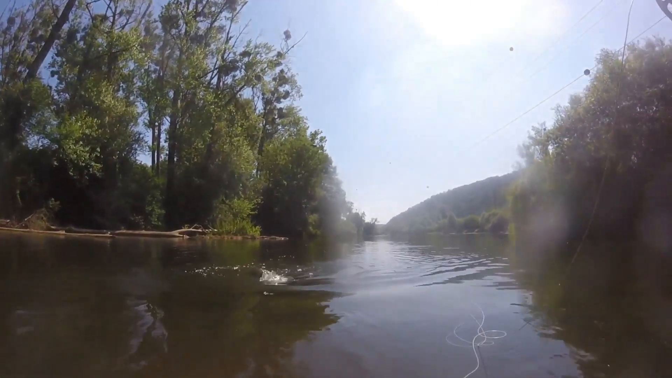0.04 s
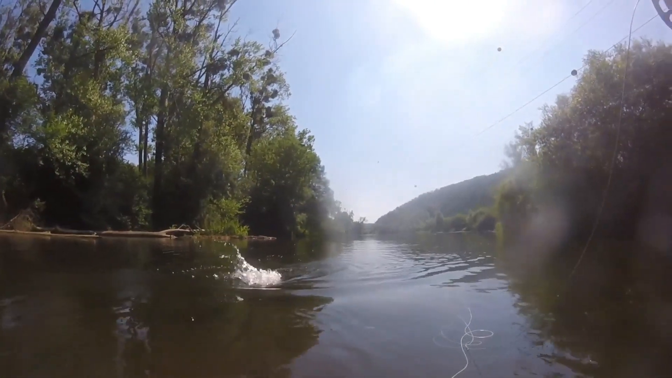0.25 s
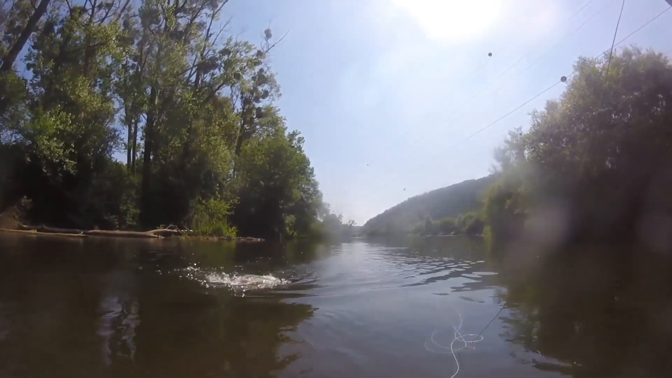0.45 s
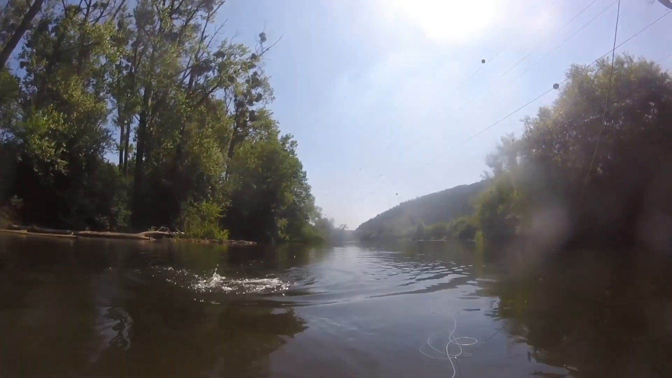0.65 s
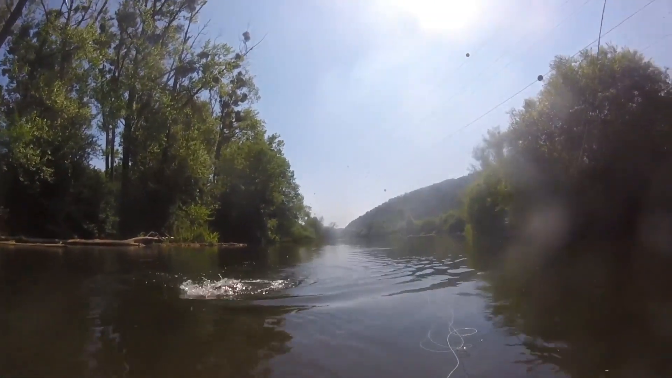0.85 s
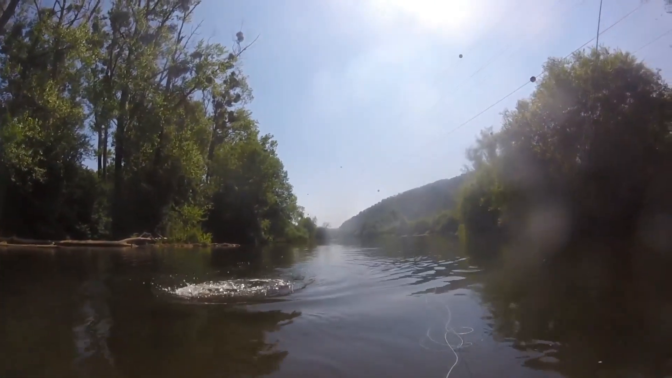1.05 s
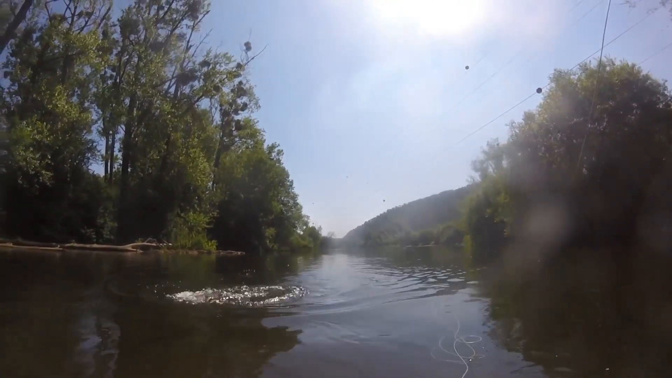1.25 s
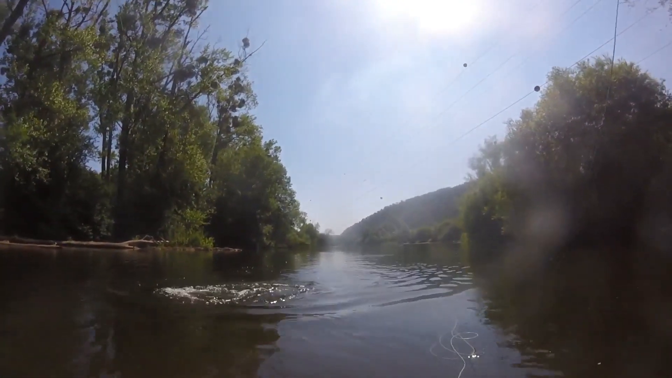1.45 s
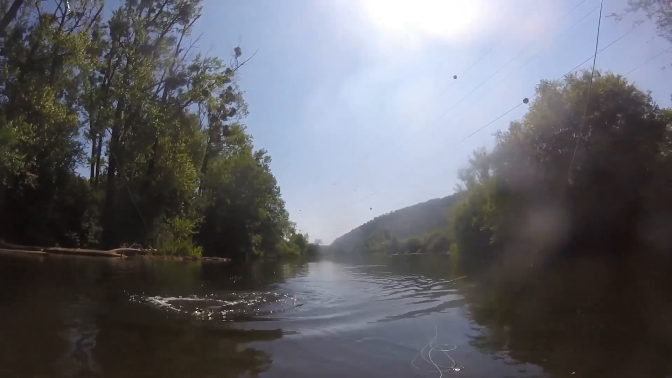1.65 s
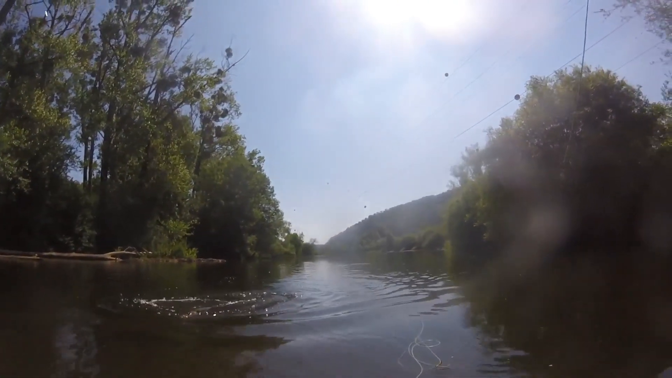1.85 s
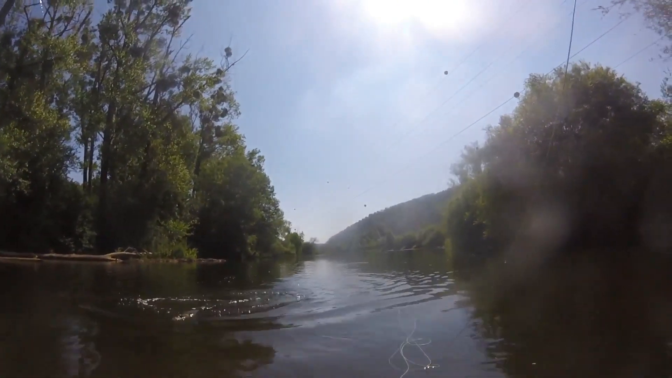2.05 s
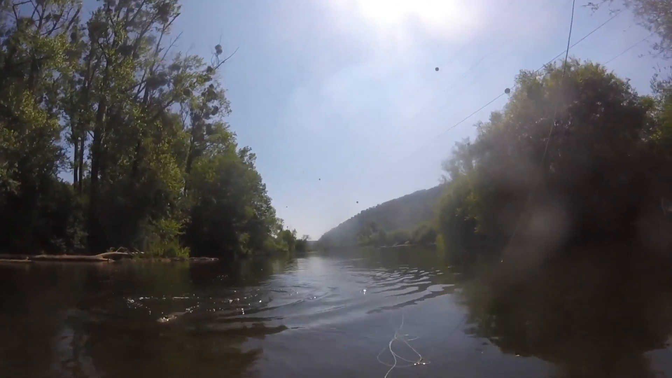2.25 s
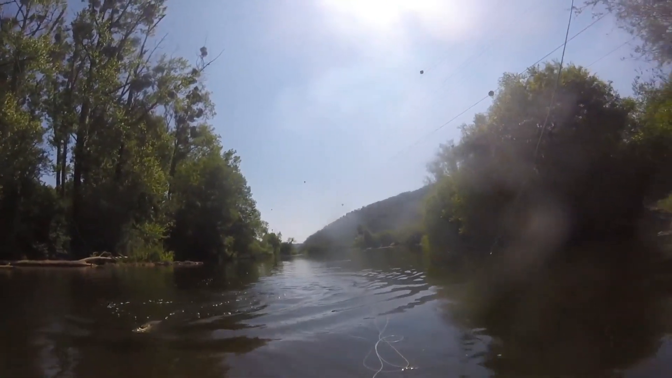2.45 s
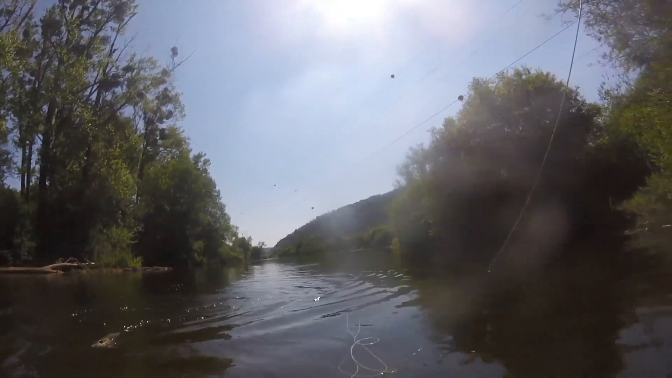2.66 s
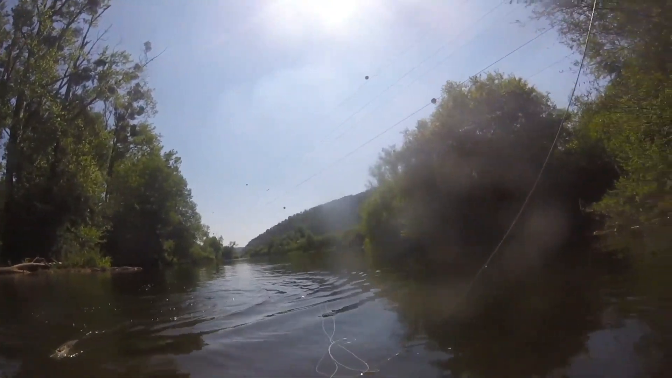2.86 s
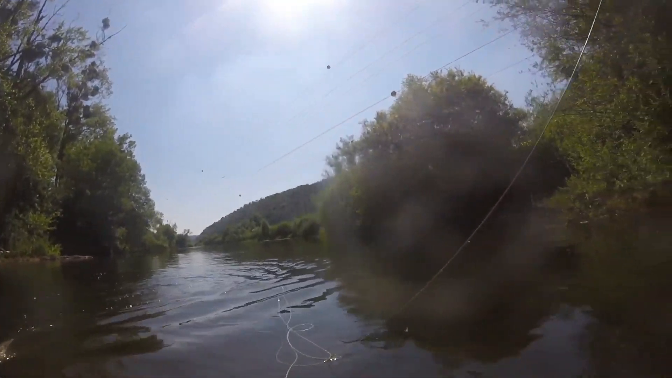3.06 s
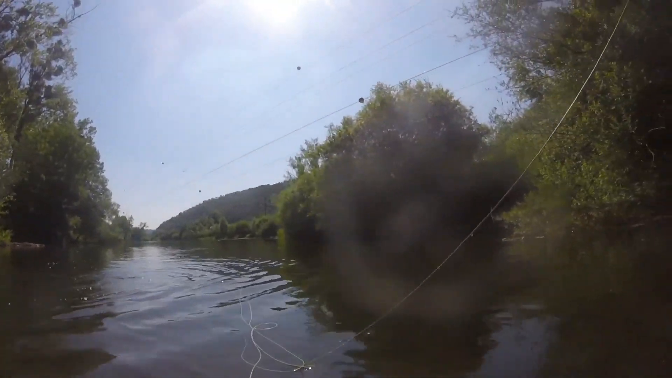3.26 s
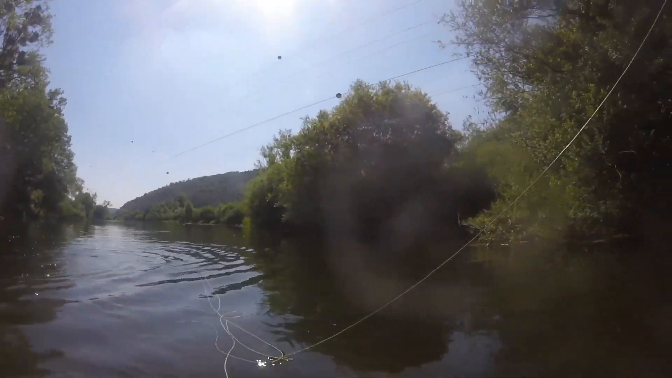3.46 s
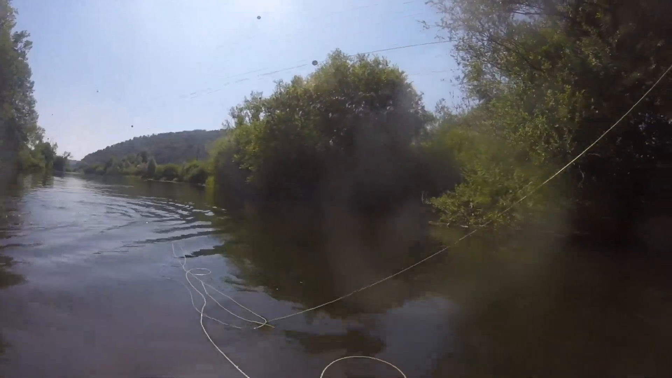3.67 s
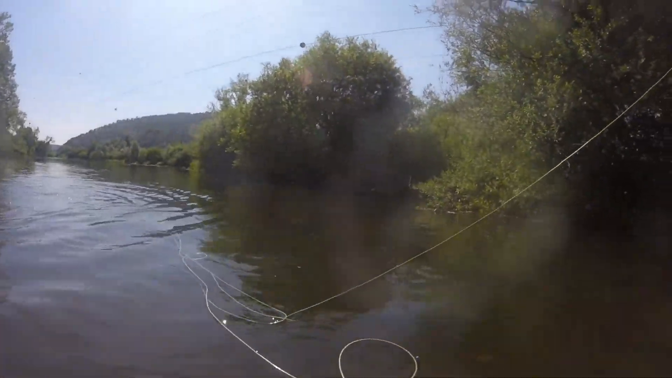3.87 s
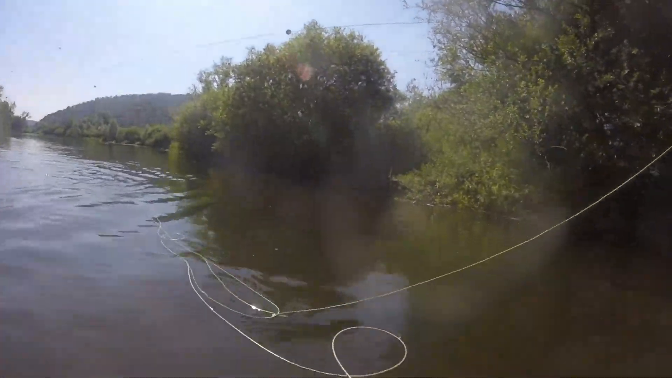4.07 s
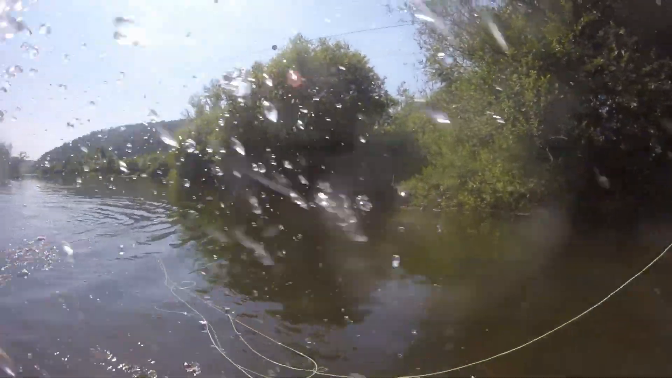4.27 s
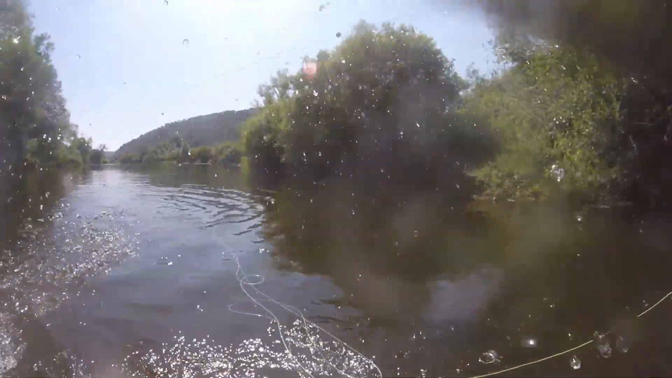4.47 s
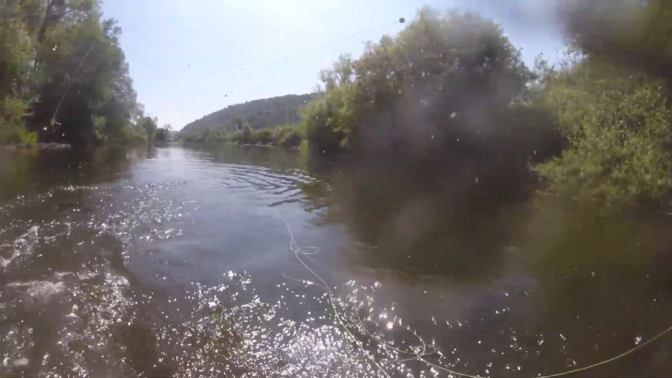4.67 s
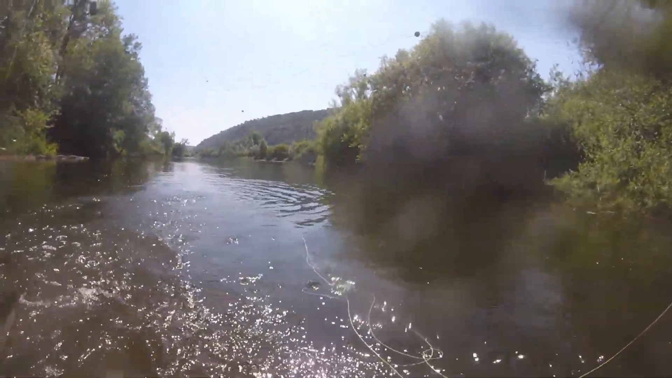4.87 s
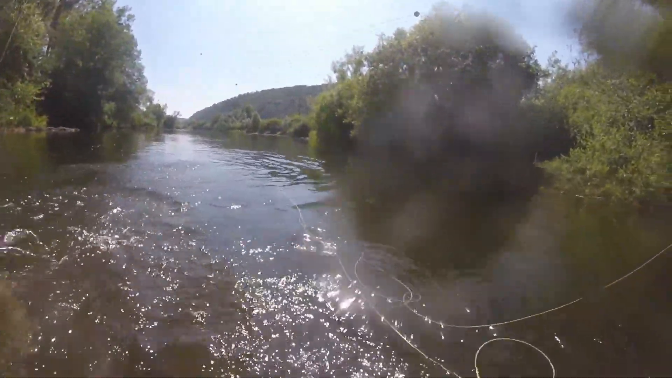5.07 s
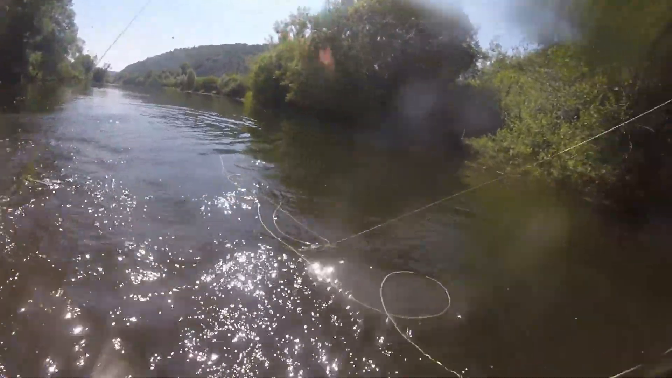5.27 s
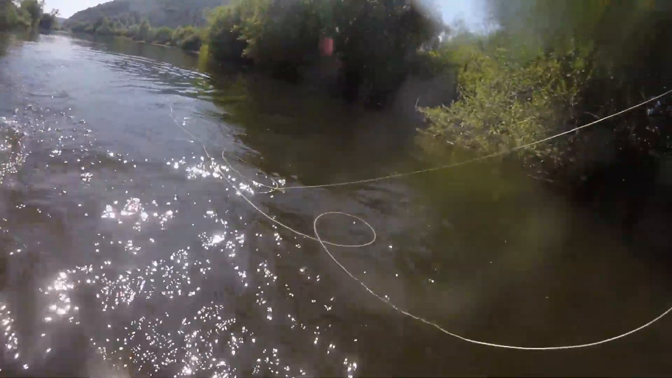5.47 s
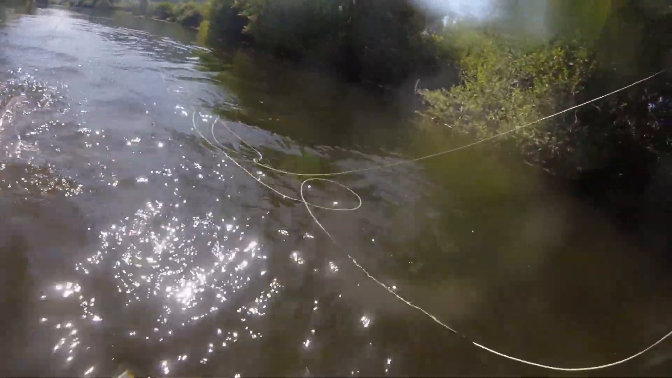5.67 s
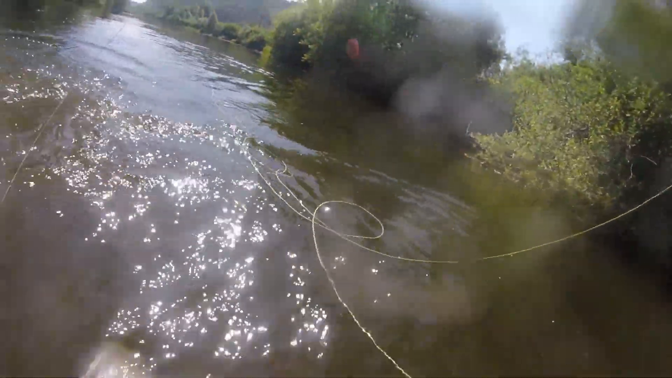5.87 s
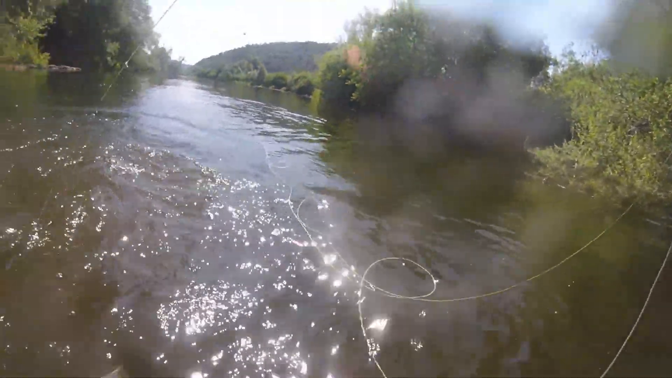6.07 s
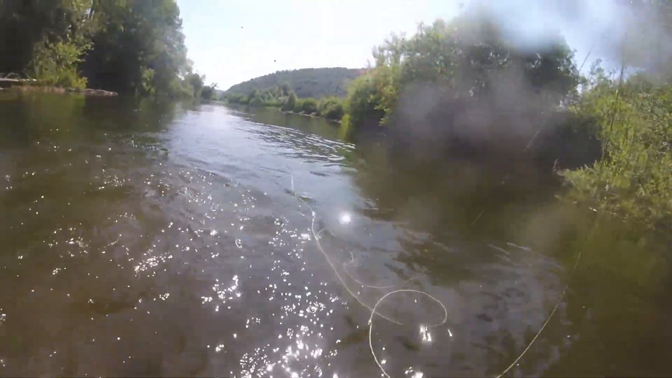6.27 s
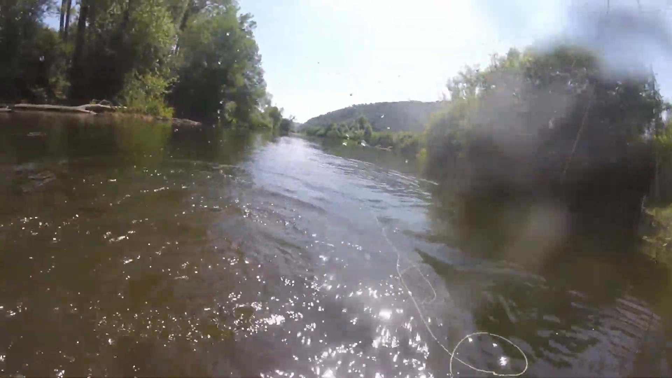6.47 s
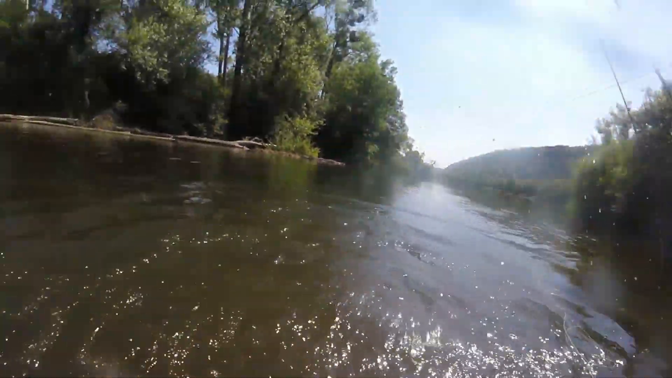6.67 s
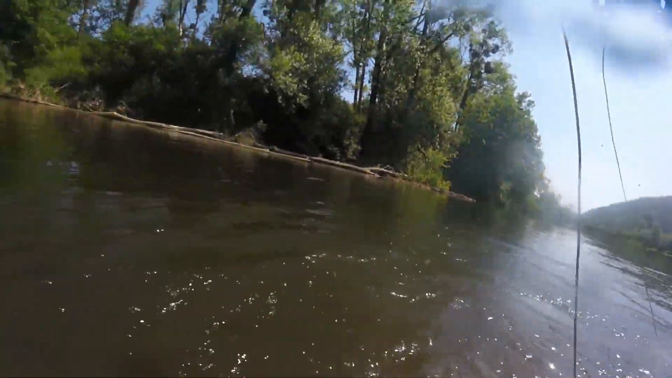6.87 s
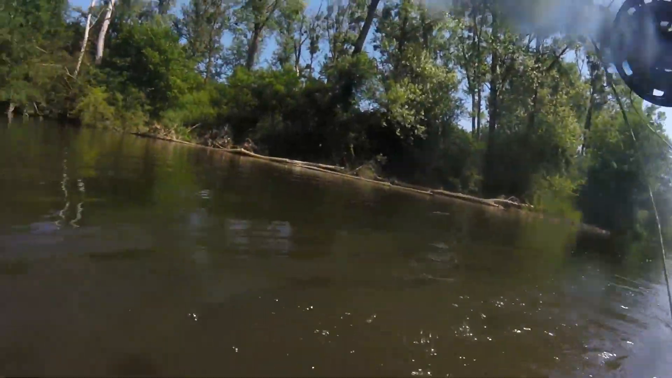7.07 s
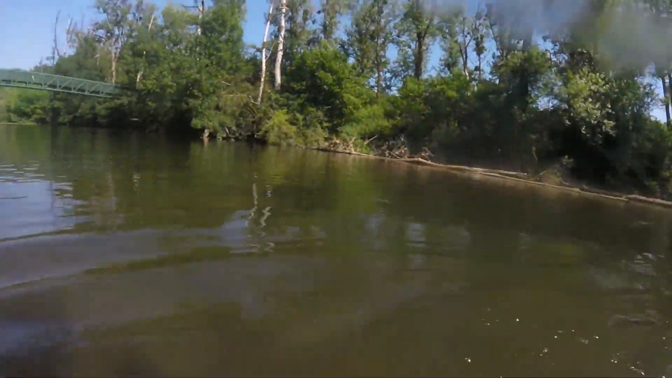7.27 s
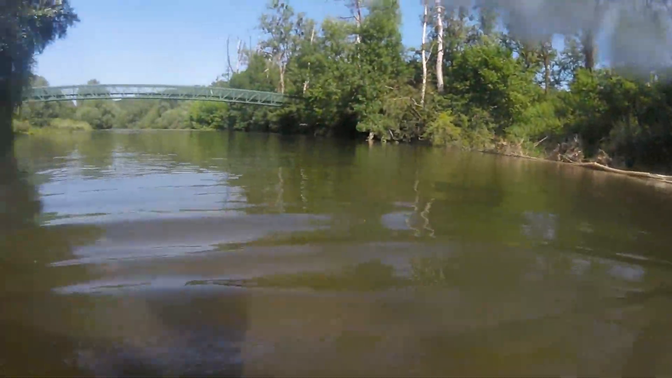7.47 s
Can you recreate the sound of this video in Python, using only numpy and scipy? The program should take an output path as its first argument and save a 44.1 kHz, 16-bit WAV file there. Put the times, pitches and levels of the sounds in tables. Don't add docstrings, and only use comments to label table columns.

```python
import sys
import numpy as np
from scipy import signal
from scipy.io import wavfile
from scipy.ndimage import uniform_filter1d

SR = 44100
rng = np.random.default_rng(int(sys.argv[2]) if len(sys.argv) > 2 else 0)


def invert_db(x):
    u = np.asarray(x, float) / 20
    return 10 ** u


def to_wav(sig):
    pcm = np.clip(np.atleast_2d(sig), -1, 1) * 32767
    pcm = np.round(pcm).astype(np.int16)
    wavfile.write(sys.argv[1], SR, pcm.T)


N = 331499

# hz, level_db_per_hz
AIR_COLOUR = [(12, -26), (20, -17), (42, -2), (373, -19), (464, -20.5), (1680, -30.5), (2210, -30.5),
              (3060, -34), (6770, -42.5), (8430, -47.5), (9930, -49.5), (11100, -52.5), (13800, -58)]
AIR_DB = -52
# hz, level_db
WHINE = [(9652, -83)]

# time_s, effort_db
EFFORT = [(0.0, -19), (2.6, -23.5), (3.5, -14), (4.1, -9), (4.45, -7.5), (4.9, -3), (5.55, 0.5), (6.05, -1),
          (6.3, -2), (7.05, -3.5), (7.27, -15.5), (7.38, -4.5), (7.52, -4)]
IDLE_DB, IDLE_HZ, IDLE_WANDER = -24.5, 12, 0.1996
# dip_s, peak_db, swing_hz
LURCHES = [(3.739, -27.5, 11), (3.952, -21, 10.6), (4.22, -16, 17), (4.35, -23, 12.7), (4.558, -27.5, 27.4),
           (4.773, -10.5, 15.5), (5.011, -15.5, 10), (5.283, -23.5, 15.3), (5.39, -14.5, 10.3),
           (5.582, -12, 14.1), (5.77, -11, 13.3), (6.025, -12.5, 11.4), (6.204, -24, 9.5),
           (6.351, -20, 13.4), (6.489, -18, 9), (6.752, -22.5, 8.1), (7.102, -19, 10.6),
           (7.452, -20.5, 8.1)]
LURCH_CYCLES = 1
# hz, level_db_per_hz
RUMBLE_COLOUR = [(14, -55.5), (24, -6), (31, 3.5), (43, -9), (59, -11), (171, -25.5), (227, -40),
                 (400, -38), (520, -79), (880, -120)]
RUMBLE_DB = -36
# peak_s, level_db, length_s
JOLTS = [(3.59, -41, 0.067), (4.22, -35, 0.048), (4.36, -30, 0.03), (4.53, -33, 0.017), (4.98, -48, .03),
         (5.04, -27.5, 0.039), (5.6, -35, 0.057), (6.06, -32, 0.068), (6.46, -31.5, 0.018),
         (6.6, -26, 0.017), (7.37, -40, 0.034)]

# peak_s, level_db, length_s
FISH = [
    (0.098, -57.5, 0.35),
    (0.29, -55, 0.016),
    (0.5, -60.5, 0.04),
    (0.825, -54.5, .2),
    (1.19, -63, 0.025),
]
# hz, level_db_per_hz
FISH_COLOUR = [(180, -44), (300, -2), (574, -4.5), (781, 0), (1220, -9.5), (1340, -11), (2520, -1),
               (2900, -13.5), (3950, -8), (4400, -23), (5130, -25), (12000, -49), (15600, -72),
               (22000, -120)]
# time_s, level_db
PATTER = [
    (4.41, -51),
    (4.47, -68),
    (4.62, -66),
    (4.75, -64),
    (4.85, -76),
    (5.0, -69),
]
# start_s, # peak_db, pitch_hz
DRIPS = [(0.125, -48, 2470), (0.288, -39.5, 812), (0.405, -43, 2552), (0.503, -48.5, 716),
         (0.809, -43, 2370), (0.84, -35, 2490), (0.856, -40, 794), (1.008, -43, 2520), (4.456, -34, 2000),
         (4.553, -38.5, 603), (4.705, -47, 1160), (4.738, -45, 1320), (4.82, -45, 525), (4.821, -41, 2460),
         (4.882, -44, 584), (5.1, -42.5, 470), (5.16, -41.5, 396), (5.219, -39.5, 480), (5.0, -43.5, 595),
         (5.289, -41, 1270), (5.363, -43, 1170), (5.381, -43, 1790), (5.478, -41, 1286), (5.54, -35, 2860),
         (5.563, -32.5, 770), (5.646, -39.5, 2200), (5.683, -40.5, 2400), (5.849, -34, 2220),
         (5.903, -45.5, 1350), (6.034, -42, 1680), (6.106, -38, 1740), (6.132, -42, 1270),
         (6.193, -40.5, 2440), (6.226, -42.5, 2240), (6.306, -37.5, 1810), (6.328, -41, 2250),
         (6.352, -42, 3500), (6.728, -39, 724)]
# start_s, peak_db, centre_hz
TICKS = [(0.101, -43, 3900), (0.178, -53, 5170), (0.509, -53, 4130), (0.621, -52, 3160), (0.859, -47, 3780),
         (1.123, -50, 3300), (4.471, -57, 4970), (4.51, -41, 3400), (4.545, -38, 3330), (4.602, -53, 4760),
         (4.615, -48, 6400), (4.648, -47, 3500), (4.687, -46, 4600), (4.701, -45, 3630),
         (4.765, -41.5, 3930), (4.827, -49, 4930), (4.883, -43, 3369), (4.96, -46, 3410),
         (5.294, -47, 3360), (5.433, -44.5, 4630), (5.464, -45.5, 5600), (5.479, -48, 4909),
         (5.598, -44, 3520), (5.819, -48.5, 4040), (5.932, -48, 3380), (6.686, -47, 5000),
         (7.046, -47.5, 3630),
         (4.4404, -44, 3400), (4.444, -46, 5000), (4.4554, -43, 4800), (4.586, -53, 5100),
           (4.595, -49, 5800), (4.6294, -50, 4600), (4.6764, -53, 5200), (4.688, -54, 7000),
           (4.6944, -54, 6500), (4.7264, -53, 6500), (4.7324, -54, 6000), (4.739, -53, 6500),
           (4.749, -56, 6300), (4.7586, -46, 3670), (4.79, -59, 7000), (4.813, -49, 4500),
           (4.8884, -51, 3600), (4.9104, -56, 6000), (4.9182, -49, 3400), (4.9457, -55, 6000),
           (4.959, -53, 6700), (5.0439, -52, 6900), (5.6216, -48, 3100), (6.0314, -48, 3470),
           (6.626, -48, 3390), (6.7251, -50, 3000)]
# start_s, level_db,
# centre_hz, length_s
SPURTS = [(4.049, -36, 2160, .008), (4.057, -43.5, 760, .015), (4.066, -56, 3800, .015),
          (4.09, -50.5, 3300, .012), (4.09, -64, 6900, .012), (4.094, -58, 2280, .012),
          (4.107, -45.5, 770, .03), (4.149, -55, 6650, .016), (4.152, -50.5, 3700, .012),
          (4.163, -41, 520, .014), (4.176, -50, 3300, .008), (4.178, -46.5, 2330, .015),
          (4.21, -58.5, 6800, .02), (4.218, -43.5, 554, .015), (4.228, -46.5, 2250, .012),
          (4.279, -53, 5960, .008), (4.301, -53, 5900, .015), (4.374, -24.5, 5580, 0.013),
          (4.372, -24, 4200, .014), (4.375, -36, 7700, .007), (4.417, -39, 2300, .022),
          (4.506, -47.5, 2360, .02), (4.589, -50.5, 2330, .035), (6.17, -57.5, 2680, .02),
          (6.617, -50, 816, .04), (0.099, -52, 3900, .006), (0.1, -52, 2300, .012),
          (0.836, -48, 3400, .006), (0.837, -48, 1400, .008), (4.422, -58, 11000, .004),
          (4.98, -53, 2100, .012), (5.05, -52, 2300, .03), (5.537, -47, 3550, .006), (5.59, -51, 2400, .03),
          (5.678, -50, 1900, .006), (5.72, -54, 3600, .01), (5.9, -50, 1300, .02), (6.031, -50, 2300, .008),
          (6.09, -51, 2400, .015), (6.19, -52, 1800, .025), (6.44, -51, 2350, .01), (6.475, -46, 650, .006),
          (6.572, -56, 11500, .004), (6.8, -53, 2200, .05), (7.04, -54, 2250, .03)]

# start_s, length_s, start_hz, end_hz, level_db
NOTES = [(1.548, 0.064, 3650, 3540, -56), (1.646, 0.059, 3800, 3600, -58), (1.68, 0.2, 3640, 3720, -63.5),
         (1.673, 0.19, 3950, 4100, -69), (1.854, 0.064, 3800, 3440, -55), (2.065, 0.075, 2600, 2480, -55.5),
         (2.13, .035, 2470, 2570, -60), (2.366, .03, 3300, 3350, -67), (2.433, 0.033, 3280, 3450, -65),
         (2.526, .025, 3330, 3400, -67), (2.607, 0.056, 3950, 3460, -57.5), (2.721, 0.034, 3540, 4100, -65),
         (2.749, 0.033, 3150, 3520, -55), (2.775, 0.054, 3250, 3300, -63), (2.778, .035, 3500, 3520, -60),
         (2.765, 0.045, 3900, 4100, -60.5), (2.835, 0.057, 3780, 3520, -59),
         (2.904, 0.0274, 3480, 3190, -54.5), (2.93, .07, 3230, 3250, -62.5),
         (2.928, 0.018, 3930, 3990, -59), (3.328, 0.016, 3050, 3780, -59), (3.4, .012, 4600, 4500, -57),
         (3.406, .012, 4050, 3950, -62), (3.413, 0.013, 3700, 3120, -57)]
# centre_hz, width_hz, gain_db
BIRD_LIFT = [(3250, 290, -3), (3890, 420, -1)]
TRILL_S, TRILL_GAP_S, TRILL_DB, TRILL_ENDS_DB = 1.964, .0736, -49.5, -2.5
BUZZ_FALLING, BUZZ_RISING, BUZZ_TRILL = .45, .55, .22

# peak_s, level_db, length_s
STROKES = [
    (3.0, -49.5, 0.063),
    (3.28, -47.5, 0.078),
    (3.62, -47, 0.055),
    (3.75, -52, 0.025),
    (3.88, -50.5, 0.036),
]
# peak_s, level_db, length_s
SLOSHES = [
    (4.46, -45, 0.12),
    (4.65, -53, 0.34),
    (5.27, -48, 0.037),
    (5.575, -46.5, 0.086),
    (5.83, -51.5, 0.19),
    (6.3, -52.5, 0.22),
    (6.575, -36, 0.016),
    (6.65, -48.5, 0.058),
    (6.79, -50.5, 0.1),
    (6.98, -53, 0.099),
]
# hz, level_db_per_hz
WADE_COLOUR = [(59, -58), (100, -9.5), (160, -1.5), (292, -18.5), (426, -9), (793, -13.5), (1290, -20.5),
               (1400, -28), (2360, -16), (2850, -42), (3260, -25.5), (4660, -42.5), (9000, -52.5),
               (11700, -73.5), (19800, -120)]
WASH_DB, WASH_FROM_S = -54.5, 2.7

# time_s, level_db
RIP = [
    (4.053, -44),
    (4.12, -46),
    (4.143, -47.5),
    (4.18, -47),
    (4.2, -47),
    (4.23, -46.5),
    (4.275, -51.5),
    (4.31, -38.5),
    (4.33, -38),
]
# hz, level_db_per_hz
RIP_COLOUR = [(200, -29), (400, -3), (770, 3), (950, -4), (1310, -2.5), (1900, -9.5), (2250, 4.5),
              (2750, -15.5), (3300, -5), (4400, -22), (6200, -22), (6900, -10), (7400, -23), (8300, -30),
              (9000, -50)]
# peak_s, peak_db,
# pitch_hz
KNOCKS = [(4.17, -38, 150), (4.212, -46, 45), (4.3, -32.5, 190), (4.359, -28, 150), (4.47, -33, 200),
          (4.54, -32.5, 147), (4.335, -17, 260), (4.378, -12, 330), (4.387, -27, 404), (4.883, -22.5, 149),
          (4.975, -23.5, 111), (4.998, -23, 323), (5.099, -26.5, 117), (5.186, -37, 127),
          (5.219, -35.5, 310), (5.264, -38, 139.1), (5.56, -27.5, 318), (5.631, -30.5, 141),
          (5.767, -36, 426), (5.837, -32, 121), (6.071, -31, 107), (6.478, -32.5, 335), (6.585, -31, 191),
          (6.59, -21, 390), (6.596, -30, 200), (6.645, -37, 230), (6.66, -41, 260), (6.72, -32, 165),
          (6.8, -47, 240), (6.851, -40, 210), (6.872, -40, 219)]
# start_s, peak_db, wall_hz, crack_db
SPRAY = [(4.316, -27, 3400, -9.5), (4.321, -14, 596, -14.5), (4.3269, -10.5, 514, -19),
         (4.3326, -5.5, 400, -30), (4.3347, -7, 3480, -4.5), (4.3365, -6, 2450, -22),
         (4.346, -11, 3390, -12.5), (4.349, -11, 626, -27), (4.3549, -14.5, 2460, 2),
         (4.361, -18.5, 616, -21.5), (4.3627, -14, 3400, -9), (4.3672, -24, 4500, 2),
         (4.3722, -11, 3300, -6), (4.3744, 3.5, 1320, -18), (4.378, 0, 1370, -8), (4.3823, -22, 1260, -8),
         (4.382, -2, 2385, -5.5), (4.396, -8, 2510, -6.5), (4.4071, -16, 3220, -18),
         (4.411, -23, 1010, -6.5), (4.4245, -35, 5430, 0), (4.798, -22.5, 1420, -24),
         (4.799, -26, 544, -34), (6.56, -29, 3300, -9), (6.5632, -30, 3320, -1), (6.569, -30.5, 1210, -18),
         (6.573, -30, 2610, -2), (6.5713, -27, 1080, -3.5), (6.58, -21.5, 3390, -19),
         (6.593, -34, 3500, -25)]
# hz, level_db, t60_s
HOUSING = [(690, -7, .012), (1370, -10, .018), (2380, -8, .014), (3450, -6, .016), (6900, -14, .008)]
WALL_T60_S, WALL_DAMPING = 0.015, 0.13
# time_s, level_db
SHEET = [
    (4.322, -26),
    (4.336, -16.5),
    (4.35, -25.5),
    (4.37, -24),
    (4.384, -11.5),
    (4.392, -30.5),
    (4.412, -29),
    (4.44, -38.5),
    (4.49, -59),
]
# hz, level_db_per_hz
SHEET_COLOUR = [(35, -37.5), (60, 5.5), (246, -2), (654, -1.5), (1130, -7), (1390, -11), (1700, -8),
                (2390, -8.5), (3000, -18), (3520, -14.5), (7810, -34.5), (12300, -39.5), (13800, -44)]
MOUNT_HZ, MOUNT_DB, MOUNT_S = 1320, -38.5, 4.376
MOUNT_T60_S, MOUNT_STOP_S = .85, 4.74
EDGE_HZ = 13650


def evened(x):
    return x / np.sqrt(np.mean(x ** 2) + 1e-20)


def add(mix, s, sound):
    part = mix[max(round(s * SR), 0):][:len(sound)]
    part += sound[:len(part)]


def curve(rows):
    return np.interp(np.arange(N) / SR, *np.transpose(rows))


def level(rows):
    t = np.arange(N) / SR
    to_edge_s = np.minimum(t - rows[0][0], rows[-1][0] - t)
    return invert_db(curve(rows)) * np.clip(to_edge_s / 0.003 + 1, 0, 1)


def swells(rows, rise, fall):
    t, power = np.arange(0, N + 32, 32) / SR, 0.
    for s, db, length_s in rows:
        u = (t - s) / (length_s * np.where(t < s, rise, fall))
        power = power + invert_db(db) ** 2 * np.exp(-2 * u ** 2)
    return np.interp(np.arange(N) / SR, t, np.sqrt(power))


def bandpass(x, order, low_hz, high_hz):
    return signal.lfilter(*signal.butter(order, [low_hz, high_hz], "band", fs=SR), x)


def coloured(x, colour):
    hz, (f, db) = np.abs(np.fft.fftfreq(8192, 1 / SR)), np.transpose(colour)
    gain_db = np.maximum(np.interp(np.log(hz + 1), np.log(f + 1), db), -100)
    log_gain = np.log(invert_db(gain_db))
    response = np.exp(log_gain - 1j * signal.hilbert(log_gain).imag)
    taps = np.fft.ifft(response).real[:4096]
    return evened(signal.oaconvolve(x, taps)[:N])


def water(per_s, spread_db, share, gust_db):
    flicker = evened(uniform_filter1d(uniform_filter1d(rng.standard_normal(N), 500), 500))
    hiss = rng.standard_normal(N) * invert_db(gust_db * flicker)
    hits = rng.random(N) < per_s / SR
    size = invert_db(spread_db * np.minimum(rng.exponential(1, N), 4)) * hits
    puffs = signal.lfilter([1], [1, -np.exp(-1 / 45)], size) * rng.standard_normal(N)
    share = np.clip(share, 0, 1)
    return (1 - share) * evened(hiss) + share * evened(puffs)


def ring(hz, t60_s, rise=0., soft_s=.0003):
    t = np.arange(int(t60_s * SR) + 40) / SR
    envelope = invert_db(-60 * t / t60_s) * (1 - np.exp(-t / soft_s))
    return envelope * np.sin(2 * np.pi * hz * (t + rise * t ** 2 / t60_s))


def air():
    t = np.arange(N) / SR
    whine = sum(invert_db(db) * np.sqrt(2) * np.sin(2 * np.pi * hz * t) for hz, db in WHINE)
    whine = whine * (1 + 0.26 * evened(uniform_filter1d(rng.standard_normal(N), 300)))
    return invert_db(AIR_DB) * coloured(water(300, 3., 0.093, 0.94), AIR_COLOUR) + whine


def rocking():
    noise = rng.standard_normal((N, 2))
    wander = evened(uniform_filter1d(uniform_filter1d(noise, 5000, 0), 5000, 0)).T
    phase = 2 * np.pi * np.cumsum(IDLE_HZ * (1 + IDLE_WANDER * wander[0])) / SR
    swing = invert_db(IDLE_DB + 3.8 * wander[1]) * invert_db(curve(EFFORT)) * np.cos(phase)
    for s, db, hz in LURCHES:
        t = np.arange(-2.5 / hz, 2.5 / hz, 1 / SR)
        phase = 2 * np.pi * hz * t
        shape = np.cos(phase) - 0.073 * np.cos(2 * phase + 0.42)
        add(swing, s + t[0], -invert_db(db) * np.exp(-(t * hz / LURCH_CYCLES) ** 2) * shape)
    return swing


def strap_rumble():
    rumble = coloured(water(40, 4., .1, 3.), RUMBLE_COLOUR)
    steady = invert_db(RUMBLE_DB) * invert_db(curve(EFFORT))
    return np.hypot(steady, swells(JOLTS, rise=0.92, fall=1.06)) * rumble


def fish():
    gain = invert_db(3.5) * swells(FISH, rise=.015, fall=1.3)
    return gain * coloured(water(600, 4.5, .42, 1.5), FISH_COLOUR)


def patter():
    bright = evened(bandpass(water(600, 3., .6, 2.5), 4, 2200, 7000))
    return (level(PATTER) + invert_db(-15) * swells(FISH, rise=0.07, fall=0.77)) * bright


def spurts():
    out, hiss = np.zeros(N), rng.standard_normal((len(SPURTS), 4000))
    t = np.arange(4000) / SR
    for (s, db, hz, length_s), noise in zip(SPURTS, hiss):
        wall = signal.iirpeak(hz, 5.5, fs=SR)
        band = evened(signal.lfilter(*wall, signal.lfilter(*wall, noise)))
        add(out, s, invert_db(db) * band * (1 - np.exp(-t / .0015)) * np.exp(-(t / length_s) ** 2))
    return out


def taps():
    drops = TICKS
    out = np.zeros(N)
    puffs = rng.standard_normal((len(drops), 300)) * signal.windows.hann(300) ** 6
    for (s, db, hz), puff in zip(drops, puffs):
        wide = bandpass(puff, 4, .62 * hz, min(1.5 * hz, 7900))
        tone = ring(hz, .012, soft_s=.0005)[:300]
        add(out, s - .002, invert_db(db + 3.5) * (.75 * wide + .7 * tone))
    return out


def drips():
    out = np.zeros(N)
    for s, db, hz in DRIPS:
        bubble = ring(.97 * hz, 30 / hz + 0.019, rise=0.071, soft_s=0.00097)
        add(out, s - .002, invert_db(db - 1.0) * bubble)
        add(out, s - .002, invert_db(db - 4) * ring(hz * rng.uniform(1.0, 1.39), 0.011))
    return out


def trill():
    place = np.arange(10)
    chip_db = TRILL_DB + TRILL_ENDS_DB * (place / 4.5 - 1) ** 4
    return [(TRILL_S + TRILL_GAP_S * k, .03, 4300, 2780, db) for k, db in zip(place, chip_db)]


def birds():
    out = np.zeros(N)
    flutter = evened(uniform_filter1d(rng.standard_normal(N), 80))
    for s, length_s, start_hz, end_hz, db in NOTES + trill():
        if end_hz > start_hz:
            buzz = BUZZ_RISING
        else:
            buzz = BUZZ_FALLING if end_hz > 3000 else BUZZ_TRILL
        bend = 3.0 if end_hz < 3000 else 1.4
        fade = 1.6 if start_hz - end_hz > 1200 else 0.
        u = np.linspace(0, 1, int(length_s * SR))
        glide_hz = end_hz + (start_hz - end_hz) * (1 - u) ** bend
        shake = 1 - buzz + buzz * flutter[int(s * SR):][:len(u)]
        envelope = np.sin(np.pi * u) ** .5 * (1 - u) ** fade
        add(out, s, invert_db(db) * shake * envelope * np.sin(2 * np.pi * np.cumsum(glide_hz) / SR))
    lifted = .3 * out
    for hz, width_hz, db in BIRD_LIFT:
        lifted = lifted + invert_db(db) * signal.lfilter(*signal.iirpeak(hz, hz / width_hz, fs=SR), out)
    echo = rng.standard_normal(12000) * invert_db(-60 * np.arange(12000) / SR / 1.1)
    return lifted + invert_db(-8.0) * signal.oaconvolve(lifted, echo / np.linalg.norm(echo))[:N]


def gurgle(per_s):
    out = np.zeros(N)
    for hz in np.geomspace(280, 2500, 14):
        hits = rng.random(N) < per_s / SR
        size = invert_db(4.7 * np.minimum(rng.exponential(1, N), 2.5)) * hits
        bubble = ring(hz, 18 / hz + 0.019, rise=0.17, soft_s=0.0042)
        out += signal.oaconvolve(size, bubble)[:N] * (500 / hz) ** -0.1
    return evened(out)


def wading():
    slosh = coloured(water(500, 2.7, 0.38, 1.7), WADE_COLOUR)
    begun = np.clip((np.arange(N) / SR - WASH_FROM_S) / .02, 0, 1)
    wash = invert_db(WASH_DB + 1.2 * curve(EFFORT)) * begun
    legs = np.hypot(wash, swells(SLOSHES, rise=0.65, fall=0.8))
    weave = bandpass(slosh, 2, 1600, 2500)
    cloth = swells(STROKES, rise=1.57, fall=1.0) * (slosh + 0.42 * weave)
    return cloth + legs * slosh + invert_db(-6.0) * legs * gurgle(per_s=14.)


def line_rip():
    return level(RIP) * coloured(water(500, 4., .42, 2.2), RIP_COLOUR)


def knocks():
    out = np.zeros(N)
    for s, db, hz in KNOCKS:
        t = np.arange(-2 / hz, 2 / hz, 1 / SR)
        phase = 2 * np.pi * hz * t
        push = np.cos(phase) + 0.11 * np.cos(2.0 * phase)
        add(out, s + t[0], -invert_db(db - 3.0) * np.exp(-(t * hz / 0.85) ** 2) * push)
    return out


def spray():
    out, chance = np.zeros(N), rng.standard_normal((len(SPRAY), len(HOUSING)))
    cracks = bandpass(rng.standard_normal((len(SPRAY), 300)), 4, 900, 6800)
    for (s, db, hz, crack_db), luck, crack in zip(SPRAY, chance, cracks):
        add(out, s, invert_db(db - 2.5) * ring(hz, WALL_T60_S * (1000 / hz) ** WALL_DAMPING))
        add(out, s, invert_db(db + crack_db) * crack * np.exp(-np.arange(300) / 70))
        for (mode_hz, mode_db, mode_t60_s), u in zip(HOUSING, luck):
            mode = ring(mode_hz * (1 + 0.024 * u), mode_t60_s)
            add(out, s, invert_db(db + crack_db + mode_db + 2.0 * u) * mode)
    return out


def spray_sheet():
    return level(SHEET) * coloured(water(2500, 3.5, .55, 1.5), SHEET_COLOUR)


def mount():
    out = np.zeros(N)
    t = np.arange(int(MOUNT_T60_S * SR) + 40) / SR
    damped = np.clip((MOUNT_STOP_S - MOUNT_S - t) / .1, .22, 1)
    tone = ring(MOUNT_HZ, MOUNT_T60_S) + .15 * ring(MOUNT_HZ + 11, MOUNT_T60_S)
    add(out, MOUNT_S, invert_db(MOUNT_DB) * damped * tone)
    return out


def scene():
    setting = air() + rocking() + strap_rumble() + birds()
    far_fish = fish() + patter()
    drops = spurts() + taps() + drips()
    angler = wading() + line_rip() + knocks()
    housing = spray() + spray_sheet() + mount()
    return (setting + far_fish + drops + angler + housing)[None]


def band_limit(x):
    return signal.sosfilt(signal.butter(12, 13940, fs=SR, output="sos"), x)


def record(dry):
    held = 0.99 * np.tanh(dry / 0.83)
    edged = signal.sosfilt(signal.ellip(8, .3, 45, EDGE_HZ, fs=SR, output="sos"), held)
    return band_limit(edged)


dry = scene()
out = record(dry)
to_wav(out)
```